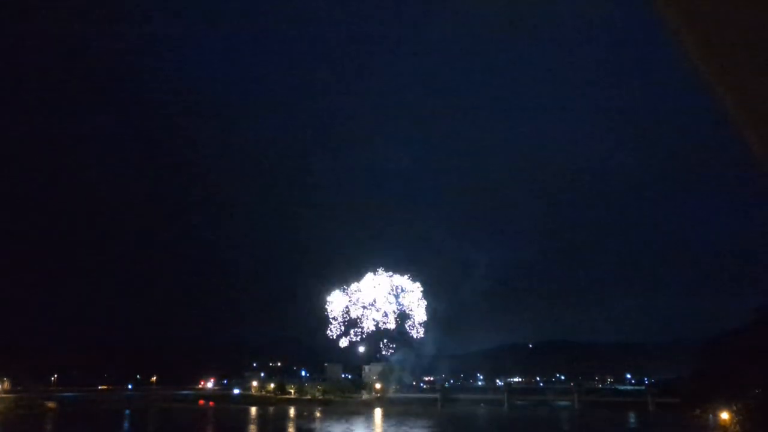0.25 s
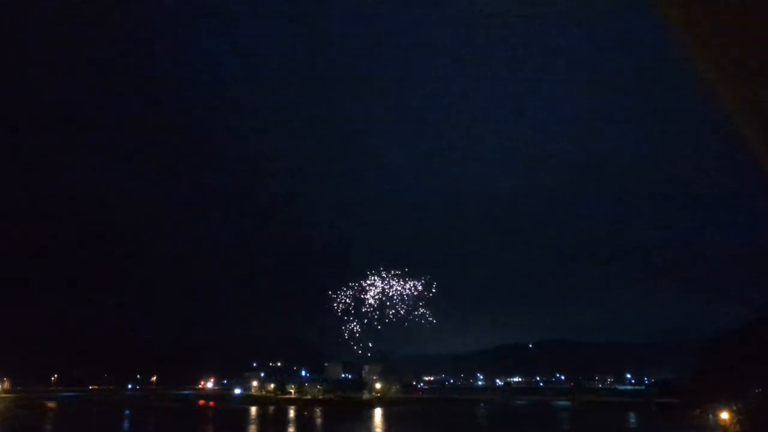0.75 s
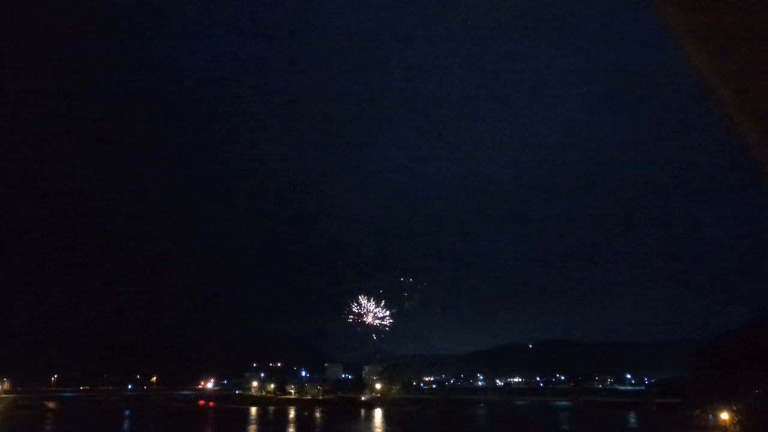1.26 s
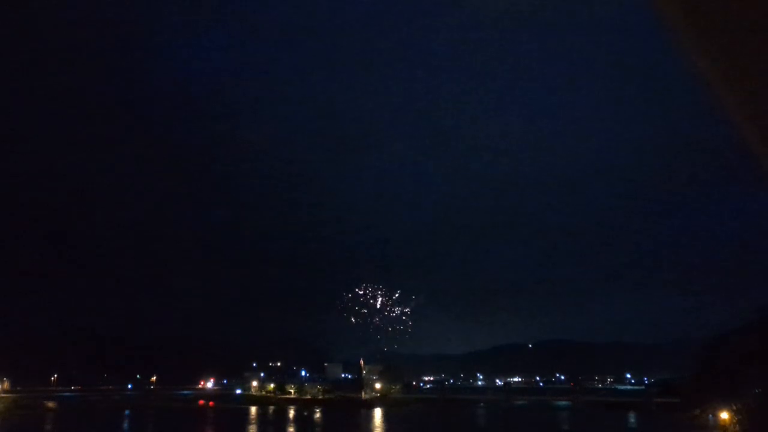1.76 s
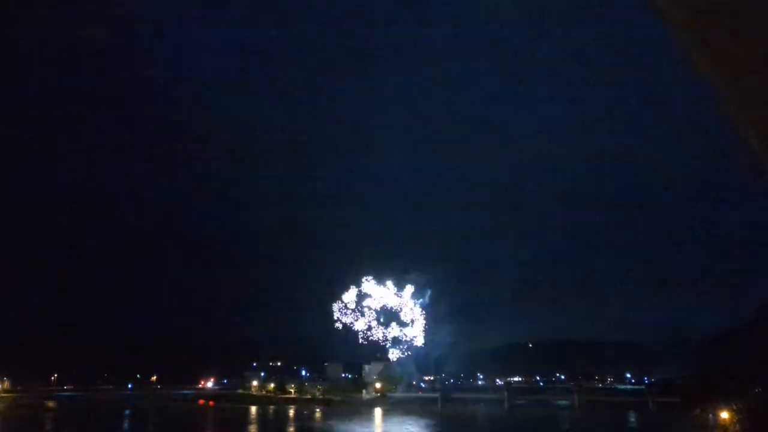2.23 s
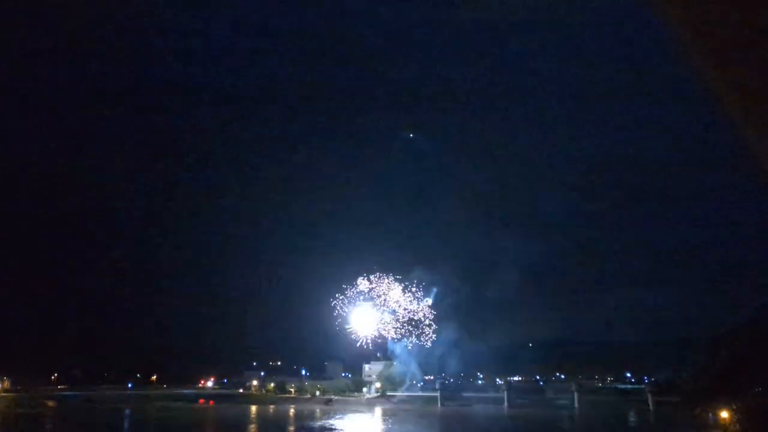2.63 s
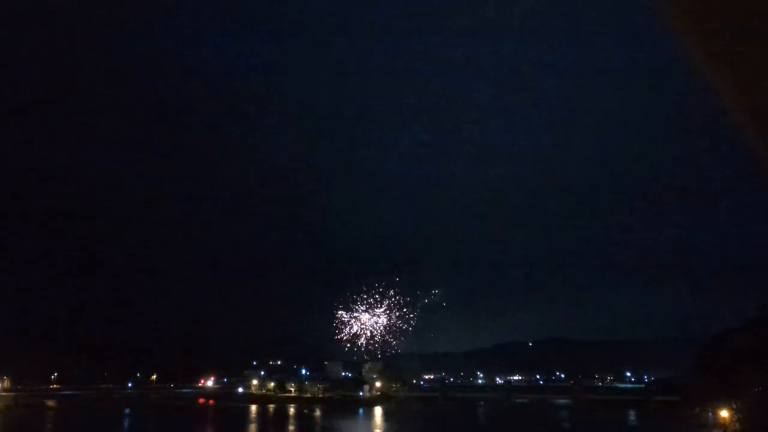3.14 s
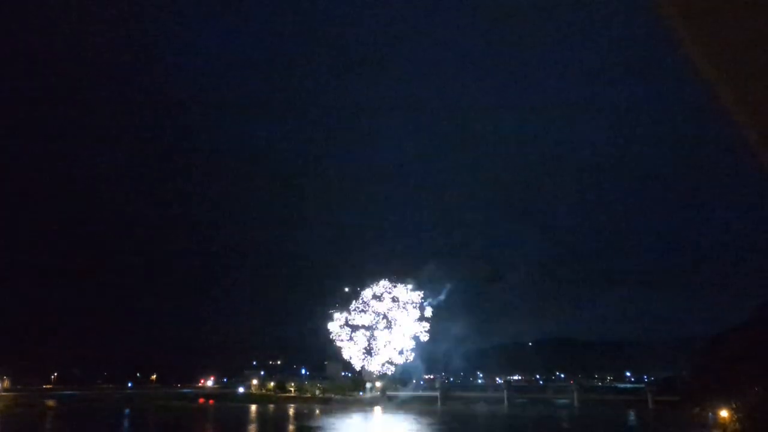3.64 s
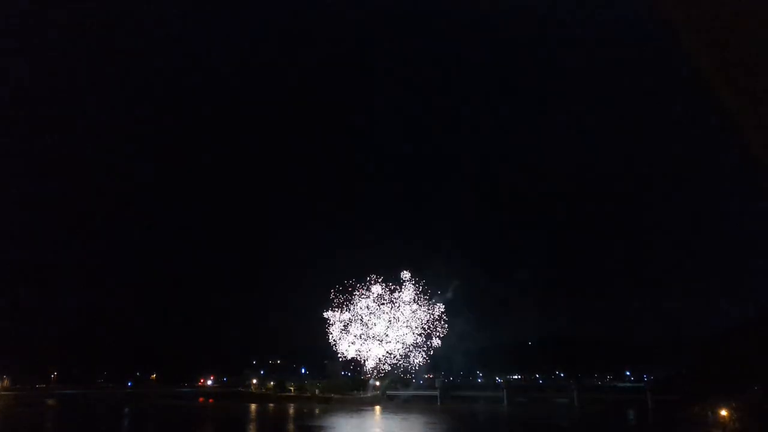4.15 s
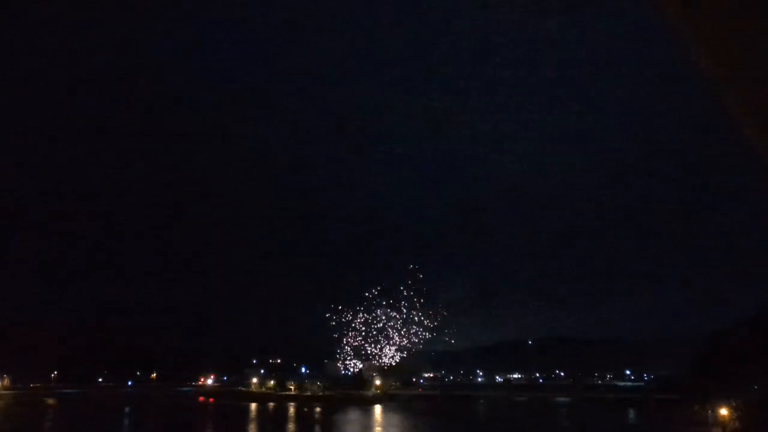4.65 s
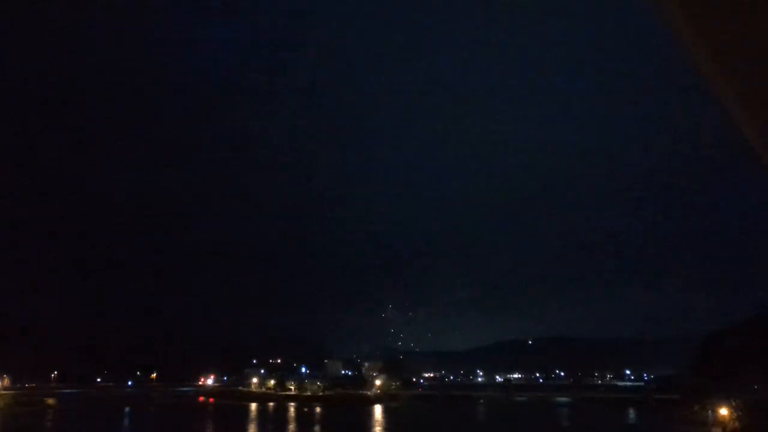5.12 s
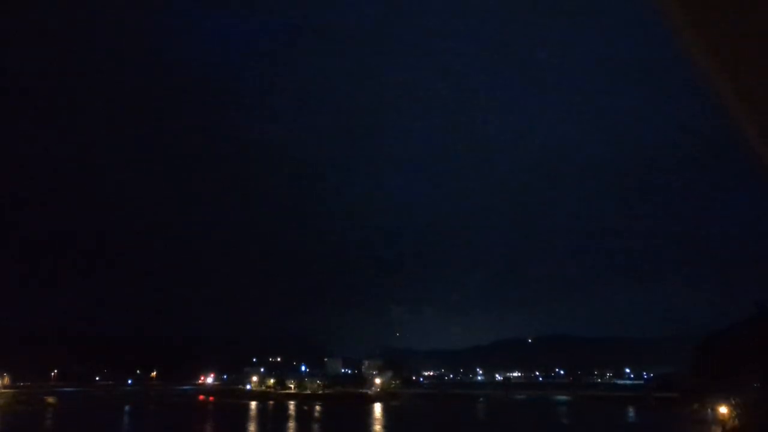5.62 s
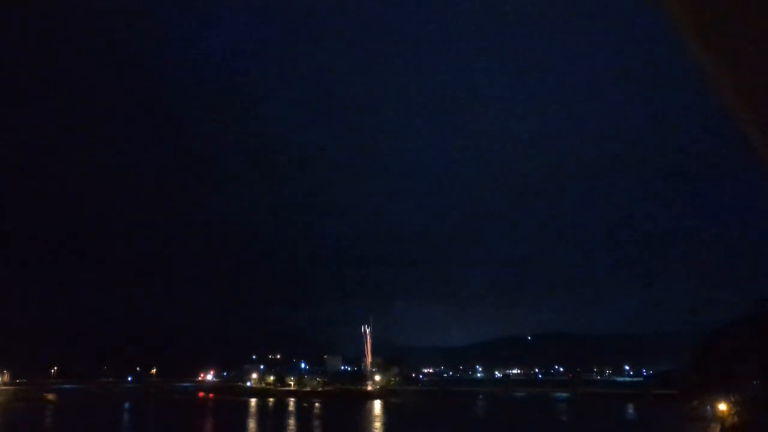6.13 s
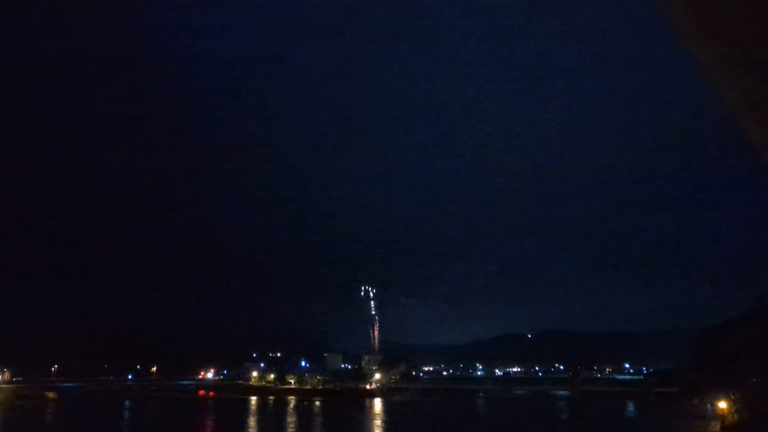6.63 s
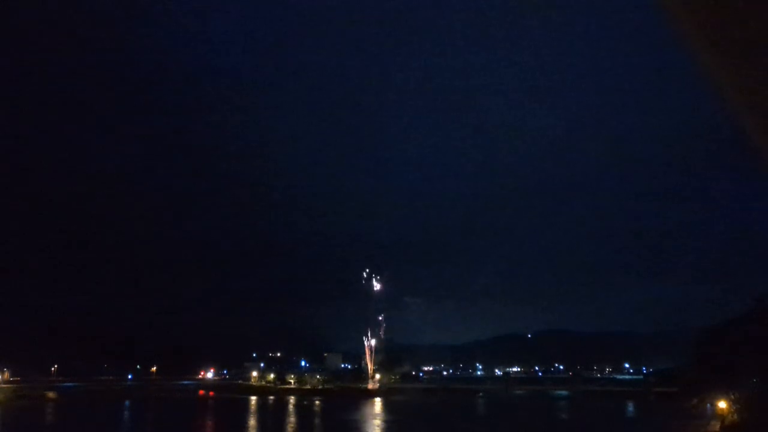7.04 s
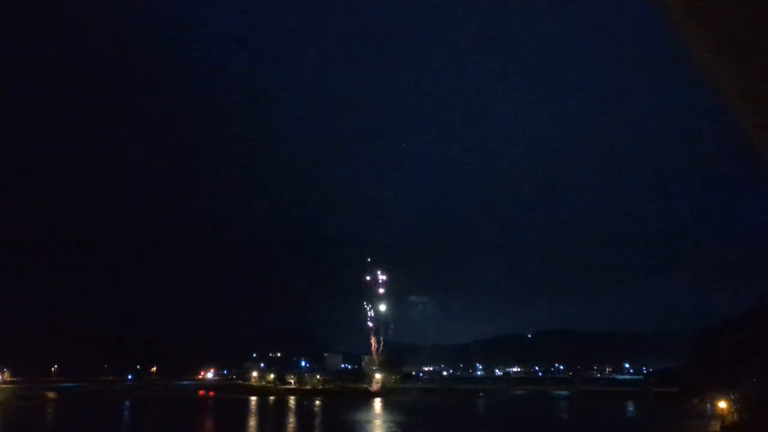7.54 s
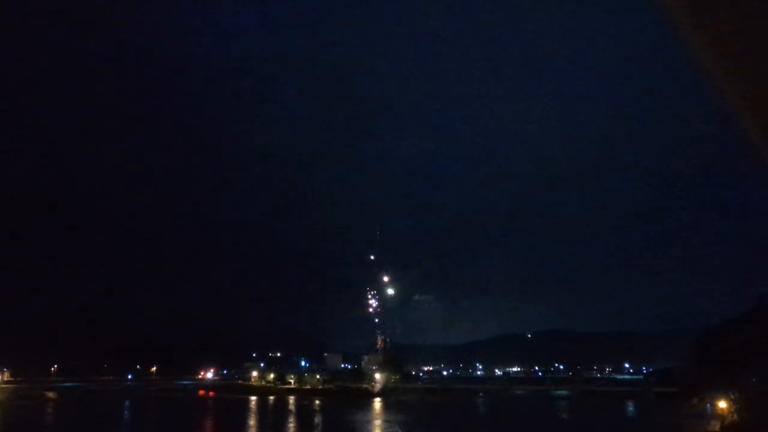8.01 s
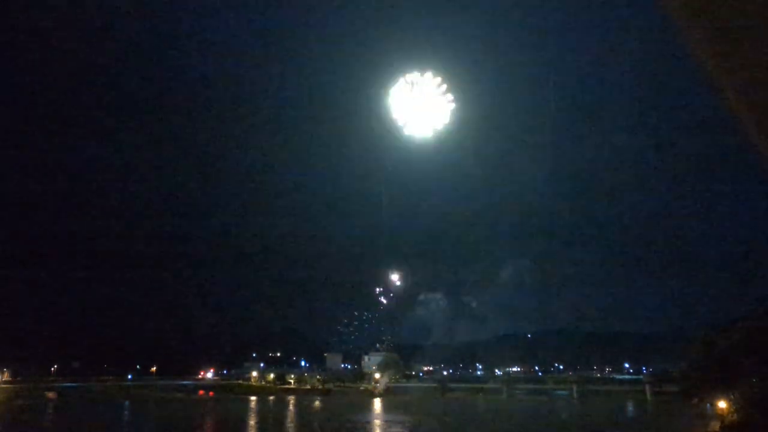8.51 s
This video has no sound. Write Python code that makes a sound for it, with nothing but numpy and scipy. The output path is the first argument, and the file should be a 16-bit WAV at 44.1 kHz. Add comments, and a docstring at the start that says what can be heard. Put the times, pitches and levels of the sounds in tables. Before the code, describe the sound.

Stereo from a balcony facing a town across water. A hard shell bang opens, echoing from a hillside on the left a third of a second later, with crackling stars. A second bang repeats this, then a tight volley of bangs around three and a half seconds. Loud popping crackle follows and dies out. Later a few mortar shots crack from the shore over rolling, fluttering rumble.

```python
"""A town across water at night: fireworks heard in stereo from a balcony.
Shells and mortars bang ahead, each a shock of five bands with near returns and a scattered tail;
a hillside on the left returns each about 0.3 s later, and other echoes, near and far, lie left too.
Clouds of crackling stars pop in random swarms, some stars popping out singly.
A valley of dense, fluttering noise rolls beneath, over a faint hiss."""
import sys
import numpy as np
from scipy import signal
from scipy.fft import rfft, irfft, next_fast_len
from scipy.io import wavfile
from scipy.ndimage import uniform_filter1d

SR = 44100
rng = np.random.default_rng(int(sys.argv[2]) if len(sys.argv) > 2 else 0)


def generate_wav(signal):
    """Clip the signal to [-1, 1] and save it as 16-bit WAV at the path in sys.argv[1]."""
    frames = np.transpose(np.atleast_2d(signal))
    scaled = np.clip(frames, -1, 1) * 32767
    pcm = np.round(scaled).astype(np.int16)
    wavfile.write(sys.argv[1], SR, pcm)


N = 386751
SIZE = next_fast_len(N + SR // 4)
HZ = np.arange(SIZE // 2 + 1) * SR / SIZE
AHEAD_LAG_S, HILL_LAG_S = 0.00006, 0.00033  # how much later the right port hears each direction

# Shells bursting ahead; sent_db is the boom sent up the valley, the last two describe the hillside return:
# start_s, crack_db, edge_db, knock_db, boom_db, thump_db, sent_db, later_ms, return_db
SHELLS = [(0.0273, -11.5, -26, -20, -9, -29, -16, 4.5, -2.5),
          (2.0539, -7.5, -24.5, -17.5, -11, -30, -10.5, 6.5, -7),
          (3.4938, -13, -18.5, -36, -23, -35, -16.5, 1, -7.5),
          (3.5074, -18, -46, -47, -16, -26, -12, 1.5, -11), (3.5879, -13, -47, -20, -20, -59, -18, 0.5, -7),
          (3.6074, -8.5, -21.5, -30, -14, -20.5, -9, -3.5, -8.5),
          (3.708, -13, -48, -18, -18, -35, -22.5, 23, 0.5),
          (3.7852, -10.5, -26, -15, -11, -18, -12, 0.8, -3.5),
          (3.8898, -11, -42, -15, -17, -30, -18.5, 0.2, -11),
          (3.936, -8, -29, -15.5, -9, -20.5, -16, 1.7, -6.5),
          (3.9493, -12.5, -27.5, -33, -22, -24, -8.5, -18, -13)]
# Mortars firing from the shore: same columns
MORTARS = [(6.9015, -5, -35.5, -14.5, -30.5, -34.5, -18, -4, -7.5),
           (6.9314, -18, -55, -26.5, -42, -32, -25, -3.5, -16),
           (7.644, -18, -63, -22, -22.5, -21, -32, -6.5, -7.5),
           (7.8363, -7.5, -34, -12, -15, -12, -16, -5.5, -4),
           (7.8662, -18, -66, -19, -24, -24, -33, -3, -16)]
# Spectrum of a shell's crack: frequency_hz, level_db
CRACK = [(300, -59), (1200, -8.5), (2300, -2), (2900, -9.5), (3700, -12.5), (4300, -18), (5600, -20.5),
         (7500, -34.5), (16000, -70)]
# Near returns of a shell from water, floor and walls: delay_s, level_db
RETURNS = [(.0018, -5.5), (.0027, -3.5), (.0075, -15), (.012, -2.5), (0.018, -7.5), (0.028, -10),
           (0.037, -18)]
# Near returns of a mortar, fired low over the water: delay_s, level_db
MORTAR_RETURNS = [(.0017, -5), (.0027, 5), (.0052, -3), (.008, -5), (0.0111, -12.5), (.016, -8)]
# Spread in time of a shell's edge, crack, knock, boom and thump (one row each), against the band's level:
# front_db, near_db, short_db, short_t60_s, long_db, long_t60_s
TAILS = [(13, 8, -8.5, 0.037, -19, 0.75), (1, -9.5, -17, 0.12, -27, 0.75), (4, -4, -7.5, 0.17, -21.5, 0.71),
         (7, 0, -8.5, 0.27, -15, 0.89), (5.5, -4, -9.5, 0.54, -18, 1.32)]
# Spread in time of a mortar's bands: same rows and columns
MORTAR_TAILS = [(8.3, 7.5, -10, 0.043, -19, 0.62), (1.3, -7, -15, 0.11, -27.5, 0.61),
                (5, -1, -7.5, 0.15, -18.5, 0.9), (7.9, -2.5, -6.5, 0.22, -15.5, 0.72),
                (5.6, 0.5, -7, 0.3, -20, 1.5)]


def shells():
    """Impulsive sources: each burst reaches the balcony as a direct shock with early reflections."""
    direct = np.array(SHELLS)[:, :6]
    return shocks(direct, AHEAD_LAG_S, 0.00025, CRACK, RETURNS, TAILS)


def mortars():
    """Impulsive sources low over water: strong early reflections follow a crack of several spectral peaks."""
    # Spectrum of a mortar's crack: frequency_hz, level_db
    mortar_crack = [(300, -56), (1200, -10), (1450, -13.5), (1730, -3), (2000, -10), (2370, 0.5),
                    (2900, -14), (3380, -10), (3800, -18.5), (4100, -18), (5000, -22), (5560, -16),
                    (6200, -25), (6640, -25.5), (7800, -31.5), (16000, -75)]
    direct = np.array(MORTARS)[:, :6]
    return shocks(direct, AHEAD_LAG_S, 0.00008, mortar_crack, MORTAR_RETURNS, MORTAR_TAILS)


def shocks(table, lag_s, smear_s, crack, returns, tails, left_db=np.zeros(5)):
    """Superposition: a shock is five bands, each a front, early reflections and diffuse decay."""
    # Spectra of the other bands: frequency_hz, level_db
    edge = [(1500, -67), (4500, -14.5), (6000, -5.5), (9000, -8.5), (12000, -14.5), (16000, -30)]
    knock = [(150, -77.5), (560, -2.5), (720, 3.5), (920, -8.5), (1150, -1), (1800, -9.5), (6000, -78.5)]
    boom = [(30, -56), (130, -3.5), (320, 0), (550, -1.5), (900, -22.5), (4000, -93.5)]
    thump = [(15, -57), (50, -20), (78, -2.5), (125, -2), (200, -5.5), (600, -79)]
    rise_s = 0.0016  # the crest comes no sooner than this after the start
    start_s, crack_db, edge_db, knock_db, boom_db, thump_db = np.transpose(table)
    levels = edge_db, crack_db, knock_db, boom_db, thump_db
    colours = edge, crack, knock, boom, thump
    t = np.arange(2 * SR) / SR
    port_s = np.array([[0], [lag_s]])
    tap_hz = np.arange(4097) * SR / 8192
    sides_s = smear_s * rng.random((len(returns), 2, 1))  # each return comes from its own side
    out = 0
    for db, colour, tail, lean_db in zip(levels, colours, tails, left_db):
        front_db, near_db, short_db, short_s, long_db, long_s = tail
        train = np.zeros(N)
        np.add.at(train, np.round(start_s * SR).astype(int), undb(db))

        # aligning the first big swing of every band gives one steep spike
        front = causal(colour)
        size = np.abs(front)
        onset = np.argmax(size > 0.5 * size.max())
        crest = onset + np.argmax(np.diff(size[onset:]) < 0)
        wait = np.zeros(max(int(rise_s * SR) - crest, 0))
        front = np.sign(front[crest]) * np.append(wait, front)
        front = front / np.abs(front).max()

        taps = undb(front_db) * np.exp(-2j * np.pi * tap_hz * port_s)
        for (delay_s, return_db), side_s in zip(returns, sides_s):
            arrival_s = delay_s + port_s + side_s
            taps = taps + undb(return_db + near_db) * np.exp(-2j * np.pi * tap_hz * arrival_s)

        short = undb(short_db - 60 * t / short_s)
        long = undb(long_db - 60 * t / long_s)
        fade = (short + long) * np.minimum(t / 0.0021, 1)
        # dividing by the front's energy brings the noise tail near the level of the front
        echoes = scatter(train, fade / np.sqrt(np.sum(front ** 2)), lag_s)
        arrivals = rfft(train, SIZE) * rfft(irfft(taps), SIZE) + echoes
        lean = undb([[lean_db / 2], [-lean_db / 2]])
        out = out + arrivals * rfft(front, SIZE) * lean
    return irfft(out, SIZE)[:, :N]


def stars():
    """Small impulsive sources: single stars pop with fixed level ratios between their bands."""
    # Stars that pop out of the swarms: start_s, crack_db
    star_pops = [(0.1073, -8.5), (0.1173, -14), (0.1245, -24), (0.1475, -22), (0.1602, -17),
                 (0.1816, -23.5), (0.1903, -26), (0.198, -15), (0.211, -18), (0.2226, -22), (0.2292, -25),
                 (0.2652, -23), (0.2914, -15.5), (0.947, -26), (0.963, -31.0), (0.9762, -33.5),
                 (1.0031, -22), (1.0103, -20), (1.0163, -20), (1.0275, -23), (1.0448, -21), (1.0703, -19),
                 (1.089, -14), (1.1331, -18.5), (1.1536, -13.5), (1.1758, -12), (1.2765, -20), (1.292, -17),
                 (1.3178, -9), (1.3732, -14), (1.3925, -17.5), (1.4091, -24), (1.4606, -18), (1.4685, -21),
                 (1.4763, -20.5), (1.4824, -19), (1.5177, -19.5), (1.5338, -22), (1.5417, -23),
                 (1.9471, -18), (1.9639, -21), (3.03, -26), (3.0386, -24), (3.0674, -18.5), (3.0851, -32),
                 (3.1106, -29), (3.1185, -16.5), (3.1335, -25.5), (3.1446, -28), (3.1806, -17),
                 (3.188, -20), (3.1972, -16), (3.204, -13), (3.2122, -11), (3.2316, -8.5), (3.2682, -11),
                 (3.275, -17), (3.316, -19), (3.3325, -19), (3.386, -14.0), (3.3925, -5.5), (3.4295, -12.0),
                 (3.4375, -12.5), (3.4618, -12), (3.4717, -12), (4.4199, -25), (4.4378, -19.5),
                 (4.479, -18), (4.4931, -24), (4.5009, -29), (4.555, -24), (4.5633, -11.0), (4.571, -15),
                 (4.5844, -16), (4.5943, -16), (4.6033, -6.5), (4.6292, -12), (4.6605, -16),
                 (4.6763, -12.5), (4.6913, -15), (4.6988, -9.5), (4.7351, -11), (4.759, -9), (4.7934, -12),
                 (4.8141, -8), (4.8313, -5.5), (4.8558, -5.5), (4.9003, -7.5), (4.9286, -5), (4.942, -6),
                 (4.9886, -7), (5.0936, -8.5), (5.1107, -4.5), (5.1217, -7.5), (5.174, -5.5), (5.186, -11),
                 (5.2162, -9), (5.227, -12), (5.2348, -10.0), (5.2428, -7.5), (5.2802, -12), (5.3004, -15),
                 (5.32, -8), (5.3358, -10), (5.3475, -9), (5.356, -15), (5.3691, -14), (5.3853, -15),
                 (5.394, -18), (5.4168, -12), (5.436, -21), (5.4727, -16)]
    # Star bands against the crack: edge_db, knock_db, boom_db, thump_db
    star_body = -37, -20.5, -26.5, -54
    # Spectrum of a star's crack: frequency_hz, level_db
    star_crack = [(300, -47), (1200, -9.5), (1700, -7.5), (2250, -2), (2800, -9.5), (3600, -14),
                  (4400, -25.5), (5800, -20.5), (7500, -33), (16000, -70)]
    # Near returns of a star: delay_s, level_db
    star_returns = [(.0018, -10.5), (.0027, -15.5), (.0079, -4), (.0165, -9)]
    # Spread in time, rows edge, crack, knock, boom, thump:
    # front_db, near_db, short_db, short_t60_s, long_db, long_t60_s
    star_tails = [(9.5, 7, -8, 0.037, -33, 0.45), (-1, -2, -15.5, 0.058, -37, 0.52),
                  (7.5, 1.5, -16, 0.051, -32, 0.6), (6.5, 6.5, -10.5, 0.13, -25, 0.71),
                  (5, -4, -10, 0.45, -23, 1.1)]
    table = [(start_s, db, *np.add(db, star_body)) for start_s, db in star_pops]
    return shocks(table, AHEAD_LAG_S, 0.00016, star_crack, star_returns, star_tails)


def crackle(spread_db=3.5, biggest=3.15, hang_db=-29, hang_s=0.013, split_hz=4300):
    """Random point process: tiny pops of uneven size and side, each with a short diffuse hang."""
    # Spectrum of the cloud: frequency_hz, level_db
    star_colour = [(80, -74), (250, -13), (600, -3), (950, -6), (1400, -3), (2200, -3), (2900, -9),
                   (3750, -17), (4200, -26.5), (5800, -31), (7000, -37), (10000, -47), (16000, -82)]
    clumps_db = 1.8  # spread of pop clumps before slewing, some 25 a second
    chance, side = rng.random(N), rng.standard_normal(N)
    size = undb(spread_db * np.minimum(rng.exponential(size=N), biggest))
    db, treble_db, log_rate = swarms()
    gains = undb([db, db + treble_db] + clumps_db * walk(25))
    rate = 10 ** np.clip(log_rate, 2, None) / SR  # chance of a pop at each sample
    pops = (chance < rate) * size / np.sqrt(rate)  # even power whatever the rate
    hang = undb(hang_db) * np.exp(-np.arange(SR // 10) / SR / hang_s)
    cloud = pair(pops, pops * side, AHEAD_LAG_S) + scatter(pops, hang, AHEAD_LAG_S)
    cloud = cloud * rfft(causal(star_colour), SIZE)
    low = 1 / (1 + (HZ / split_hz) ** 8)
    return sum(gain * unit(irfft(cloud * band, SIZE)[:, :N]) for gain, band in zip(gains, (low, 1 - low)))


def swarms():
    """Varying event density: level and log10 pops a second swell, arch and die together."""
    # Course of each swarm: first_s, full_s, loudest_s, dying_s, last_s
    swarm_times = [(-0.2, 0.0, 0.21, 0.24, 0.42), (0.97, 1.13, 1.3, 1.43, 1.62),
                   (3.03, 3.2, 3.38, 3.49, 3.56), (4.5, 4.575, 4.9, 5.36, 5.49)]
    # Strength of each swarm: level_db, treble_db (against that level)
    swarm_levels = [(-27.5, -10), (-30, -8.5), (-25.5, -12.5), (-20, -17)]
    # Level against level_db at those five times: first_db, full_db, loudest_db, dying_db, last_db
    swarm_arch = -18, -4, 1, -4.5, -17.5
    densest, thins_per_db = 3.35, 0.02  # log10 pops a second at level_db; decades lost per dB under it
    t = np.arange(N) / SR
    db, treble_db, log_rate = np.full((3, N), -200.0)
    for times, (full_db, top_db) in zip(swarm_times, swarm_levels):
        on = (t >= times[0]) & (t < times[-1])
        under_db = np.interp(t[on], times, swarm_arch)
        db[on] = full_db + under_db
        treble_db[on] = top_db
        log_rate[on] = np.minimum(densest + thins_per_db * under_db, densest)
    return db, treble_db, log_rate


def hillside():
    """Specular reflection: every shell and mortar returns late, recoloured and from the left."""
    # What the hillside does to each band: crack_db, edge_db, knock_db, boom_db, thump_db
    hill_gain = 0, -13.5, -0.5, 3, -2
    hill_s = 0.3125  # usual wait for the return
    columns = np.transpose(SHELLS + MORTARS)
    start_s, crack_db, edge_db, knock_db, _, thump_db, sent_db, later_ms, return_db = columns
    bands = np.column_stack([crack_db, edge_db, knock_db, sent_db, thump_db])
    heard_s = start_s + hill_s + later_ms * 1e-3
    table = np.column_stack([heard_s, bands + return_db[:, None] + hill_gain])
    count = len(SHELLS)
    from_shells = shocks(table[:count], HILL_LAG_S, 0.00022, CRACK, RETURNS, TAILS)
    from_mortars = shocks(table[count:], HILL_LAG_S, 0.00026, CRACK, MORTAR_RETURNS, MORTAR_TAILS)
    return from_shells + from_mortars


def other_echoes():
    """Multiple reflection: other echoes, near and far, from the left, with little of the highest band."""
    # Low thuds just after the bangs, parts of the hillside return, and later, duller echoes:
    # start_s, crack_db, knock_db, boom_db, thump_db
    echo_levels = [(0.5935, -18.5, -15.5, -17.5, -43), (2.022, -48, -41, -31.5, -55),
                   (2.3683, -32, -22, -19, -46), (2.407, -24, -16, -19, -48),
                   (2.422, -23, -18.5, -16.5, -44), (2.4461, -18, -16, -25, -41),
                   (2.463, -24, -17.5, -26, -43), (2.7822, -29, -27, -22, -55),
                   (3.7992, -24, -30, -17, -27), (3.813, -30, -32, -21, -30.5),
                   (3.965, -30, -28, -19.5, -25), (4.2446, -35, -16, -18, -50), (5.879, -48, -39, -38, -28),
                   (5.96, -48, -33, -51, -28), (6.0303, -34, -30, -27.5, -24.5),
                   (6.1069, -35, -32.5, -37, -29), (6.158, -41.5, -48.5, -35.5, -30.5),
                   (7.222, -45, -26, -25, -24.5), (7.3459, -50, -25, -34, -30), (7.501, -49, -33, -26, -28),
                   (7.612, -46, -30, -30, -41), (7.739, -54, -44, -40, -29), (7.922, -23, -20.5, -24, -31),
                   (7.975, -45, -38, -38, -27), (8.0524, -41, -27.5, -44, -35), (8.094, -48, -28, -35, -24),
                   (8.1542, -32, -32, -25, -16), (8.281, -39, -21, -38, -23.5), (8.401, -52, -48, -45, -33),
                   (8.5492, -45, -27, -36.5, -23.5), (8.711, -54, -41, -40.5, -33)]
    # Left minus right level: edge_db, crack_db, knock_db, boom_db, thump_db
    echo_left = 0, -0.5, -0.5, 1, 5.5
    edge_under_db = -43  # edge against crack
    table = [(start_s, db, db + edge_under_db, *body) for start_s, db, *body in echo_levels]
    return shocks(table, HILL_LAG_S, 0.0003, CRACK, RETURNS, TAILS, echo_left)


def valley():
    """Reverberant field: bangs and swarms feed the stored energy of the middle and treble."""
    # How the valley holds the middle and the treble (one row each):
    # bang_db, swarm_db, build_s, t60_s, drop_db (after the last big slope), town_db (quiet level)
    valley_bands = [(-13.5, -8.5, 0.043, 3.49, 0, -56.5), (-21.5, -9, 0.12, 3.14, -7.5, -51)]
    columns = np.transpose(SHELLS + MORTARS)
    return roll(*(held(columns[0], columns[6], *band) for band in valley_bands))


def held(start_s, db, bang_db, swarm_db, build_s, t60_s, drop_db, town_db):
    """Energy convolution: source power passes through a build-up and exponential decay; returns dB."""
    farthest_s = 0.9  # the last big slope answers this late; after it the field drops
    step = int(0.002 * SR)
    t = np.arange(0, N, step) / SR
    drop = drop_db / (1 + np.exp((farthest_s - t) / 0.02))
    shape = (1 - np.exp(-t / build_s)) * undb(-60 * t / t60_s + drop) ** 2
    power = undb(swarms()[0][::step] + swarm_db) ** 2 / shape.sum()
    np.add.at(power, (start_s * SR / step).astype(int), undb(db + bang_db) ** 2)
    field = np.convolve(power, shape)[:len(t)]
    return 10 * np.log10(np.interp(np.arange(N) / SR, t, field) + undb(town_db) ** 2)


def roll(middle_db, treble_db):
    """Diffuse noise: three bands flutter in level, the treble less alike in the ports and later on the right."""
    # Level of the deep rumble: time_s, level_db
    rumble = [(0.0, -39), (0.15, -51), (0.5, -59), (1.25, -52), (1.7, -63), (2.2, -52), (3.35, -61),
              (3.66, -60), (3.9, -44), (4.4, -33.5), (4.86, -43), (5.74, -42.5), (6.01, -31.5), (6.1, -52),
              (6.62, -73), (6.92, -51), (7.2, -26.5), (7.42, -32), (7.62, -29.5), (8.12, -28),
              (8.35, -28.5), (8.5, -33), (8.77, -34.5)]
    # Spectra of the three bands: frequency_hz, level_db
    deep = [(15, -71), (45, -9.5), (75, 5), (120, -6), (180, -12), (600, -75)]
    middle = [(30, -77), (100, -8.5), (160, 2.5), (320, 5), (650, -1), (800, -10), (1200, -32),
              (4000, -97.5)]
    treble = [(300, -39), (700, -10), (1100, -3), (1600, -6.5), (2500, -6), (4050, -20), (6500, -30),
              (9000, -46.5), (16000, -89)]
    levels = over_time(rumble) + [middle_db, treble_db]
    # colour, flutter rate in Hz, flutter in dB before slewing, lag in s, share of the usual likeness
    bands = [(deep, 12, 3.5, AHEAD_LAG_S, 1),
             (middle, 30, 3.2, AHEAD_LAG_S, 1),
             (treble, 40, 1.5, HILL_LAG_S, 0.5)]
    out = 0
    for db, (colour, rate, flutter_db, lag_s, share) in zip(levels, bands):
        mid, side = rng.standard_normal((2, N))
        band = irfft(undb(over_hz(colour)) * pair(mid, side, lag_s, share), SIZE)[:, :N]
        out = out + unit(band) * undb(db + flutter_db * walk(rate))
    return out


def hiss():
    """Low-passed white noise, independent in the two ports."""
    before_filter_db, cutoff_hz = -70, 8000
    low_pass = signal.butter(2, cutoff_hz, fs=SR)
    return undb(before_filter_db) * signal.lfilter(*low_pass, rng.standard_normal((2, N)))


def scatter(train, fade, lag_s):
    """Diffuse reflection: spectra of ragged noise whose power follows every pulse with the given fade."""
    ragged_db, lumps_db = 4, 1.5  # fast and slow level spread before slewing
    ragged = unit(undb(ragged_db * walk(220) + lumps_db * walk(45)))
    envelope = np.sqrt(np.abs(convolve(train ** 2, fade ** 2))) * ragged
    mid, side = envelope * rng.standard_normal((2, N))
    return pair(mid, side, lag_s)


def pair(mid, side, lag_s, share=1):
    """Stereo coherence: spectra of two ports from a shared and a scattered part, later on the right."""
    # Left-right likeness by frequency: frequency_hz, likeness (0 to 1)
    likeness = [(60, 0.58), (200, 0.98), (500, 0.73), (1000, 0.41), (2000, 0.31), (4000, 0.13),
                (12000, 0.053)]
    alike = share * np.clip(over_hz(likeness), 0, 1)
    shared = np.sqrt((1 + alike) / 2) * rfft(mid, SIZE)
    apart = np.sqrt((1 - alike) / 2) * rfft(side, SIZE)
    return np.array([shared + apart, (shared - apart) * np.exp(-2j * np.pi * HZ * lag_s)])


def causal(colour):
    """Minimum phase: folding the cepstrum gives the causal response with this gain in dB."""
    cepstrum = irfft(over_hz(colour)[::64] * np.log(10) / 20)
    half = len(cepstrum) // 2
    cepstrum[1:half] *= 2
    cepstrum[half + 1:] = 0
    return irfft(np.exp(rfft(cepstrum)))[:half]


def walk(rate):
    """Slow modulation: random levels held 1 / rate s and slewed by two moving averages."""
    hold = int(SR / rate)
    steps = np.repeat(rng.standard_normal(N // hold + 1), hold)
    return uniform_filter1d(uniform_filter1d(steps, hold), hold)[:N]


def convolve(x, response):
    """Linear superposition: x through a response, cut to the scene's length."""
    return signal.oaconvolve(x, response)[:N]


def undb(db):
    """Logarithmic level: dB to amplitude gain."""
    return 10 ** (np.asarray(db) / 20)


def over_hz(table):
    """Logarithmic frequency: a (frequency, value) table at every bin."""
    hz, value = np.transpose(table)
    return np.interp(np.log(HZ + 1), np.log(hz), value)


def over_time(table):
    """Linear interpolation: the columns of a time curve at every sample."""
    s, *columns = np.transpose(table)
    return [np.interp(np.arange(N) / SR, s, column) for column in columns]


def unit(x):
    """Power normalisation: scaled to rms 1."""
    return x / np.sqrt(np.mean(x ** 2))


def scene():
    """Superposition of the shocks, stars, crackle, echoes, valley and hiss."""
    direct = shells() + mortars() + stars() + crackle()
    echoes = hillside() + other_echoes()
    return direct + echoes + valley() + hiss()


def record(dry):
    """Transduction: the ports differ in colour, the peaks saturate softly and the top is cut."""
    # Left minus right response: frequency_hz, level_db
    port_lean = [(60, 3.5), (250, -0.5), (600, .5), (1200, 2), (2300, -6), (4000, -1.5), (8000, 2.5),
                 (15000, -2)]
    top_hz = 16300
    lean = undb(over_hz(port_lean) * np.array([[0.5], [-0.5]]))
    x = irfft(rfft(dry, SIZE) * lean, SIZE)[:, :N]
    x = x / (1 + np.abs(x) ** 6) ** (1 / 6)
    low_pass = signal.ellip(8, 0.2, 70, top_hz, fs=SR, output="sos")
    return signal.sosfilt(low_pass, x)


dry = scene()
out = record(dry)
generate_wav(out)
```